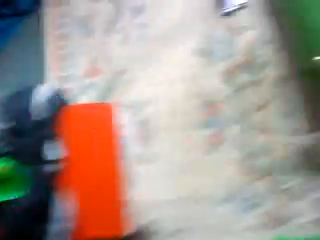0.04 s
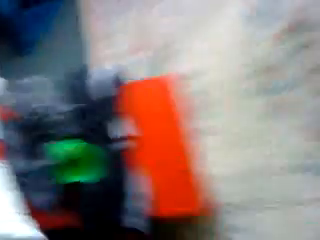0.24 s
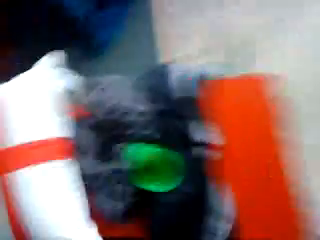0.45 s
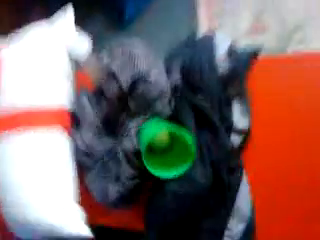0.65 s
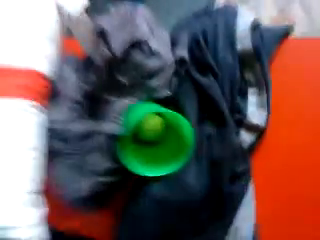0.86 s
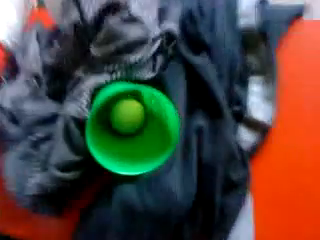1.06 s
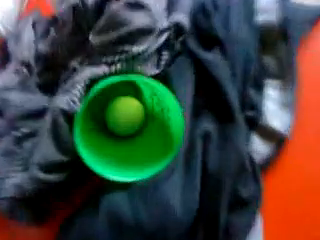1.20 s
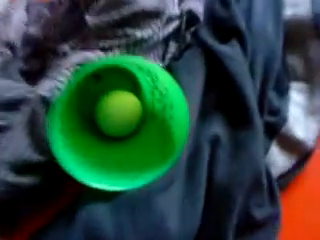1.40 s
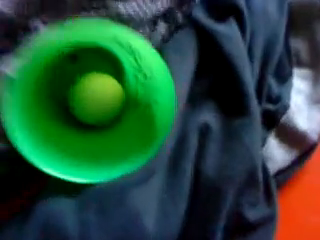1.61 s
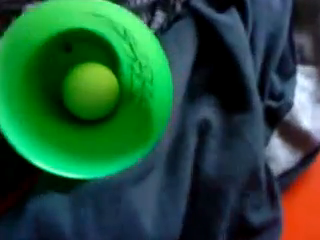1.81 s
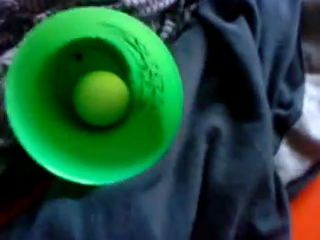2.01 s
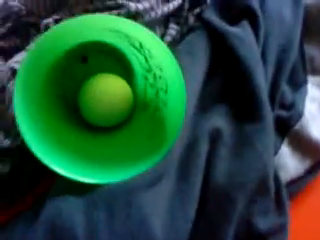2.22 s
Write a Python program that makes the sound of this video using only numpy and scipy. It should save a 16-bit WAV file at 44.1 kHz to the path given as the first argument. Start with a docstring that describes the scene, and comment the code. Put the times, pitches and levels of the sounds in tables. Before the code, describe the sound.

A small ball hits a plastic cup and settles in quick, fading hollow knocks. Before it come a tick and soft handling bumps; afterwards, faint cloth rustle and dull thuds on the moving microphone, with steady hiss in a small room.

```python
"""A ball rattles into a cup

A small ball hits a plastic cup on a heap of clothes, drops to the bottom and rattles to rest.
Each knock rings the cup's hollow near 950 Hz and its thin wall above that; a small room answers.
Someone moves with a camera: rustling clothes, soft bumps and a tick sound over hiss and rumble."""
import sys
import numpy as np
from scipy import signal
from scipy.fft import rfft, irfft, next_fast_len
from scipy.io import wavfile
from scipy.ndimage import map_coordinates

SR = 44100
rng = np.random.default_rng(int(sys.argv[2]) if len(sys.argv) > 2 else 0)


def dump_mix(stems):
    """Bounce the given channels to the path in sys.argv[1] as a 16-bit WAV at rate SR."""
    frames = np.atleast_2d(stems).T  # one column per channel
    limited = np.clip(frames, -1, 1)  # hard clip at full scale
    pcm = np.round(limited * 32767).astype(np.int16)
    wavfile.write(sys.argv[1], SR, pcm)


N = 103635

# The ball's knocks: t/s, level/dB, bottom/dB, wall/dB, crack/dB, pitch ratio of the hollow.
# Bottom, wall and crack turn that part of the knock up or down.
CUP_KNOCKS = [(0.4413, -16, -9.5, 5, 1, 1.01), (0.4457, -23, -8.5, -3.5, 0.5, 1.02),
              (0.4548, -31, -3, 3, 10.5, 1.1), (0.4808, -32, -4, -6, 2.5, 1.0),
              (0.4888, -32, 5, -10.5, 2, 1.01), (0.5042, -22, 6, 5, -1.5, 1.0),
              (0.5083, -24.5, 1, -3.5, -0.5, 1.0), (0.5377, -29.5, -4, -3, -1.5, 1.0),
              (0.5427, -40, -0.5, -2, 4, 1.1), (0.6514, -30, -11, -4.5, -6.5, .99),
              (0.662, -43, -4.5, 6, 2, 1.25), (0.691, -39.5, -14, -7, -9, .99),
              (0.769, -35.5, -9, -13, -18, 0.92), (0.8048, -33, -11, -7.5, -5, .97),
              (0.8178, -37.5, -10, -11, -9, 0.95), (0.9572, -40, 10, 4.5, 0, 0.99)]
# Tones of the cup's hollow, bottom and wall: f/Hz, level/dB, t60/s (time to fade by 60 dB)
HOLLOW_TONES = [(942, -16, 0.24), (886, -12.5, 0.085), (954, -0.5, 0.063), (1140, -9.5, 0.062),
                (1232, -18.5, 0.054)]
BOTTOM_TONES = [(568.5, -18.5, .1), (648, -7, 0.055), (724, -6, 0.051), (785, -14, .07)]
WALL_TONES = [(2034, -13.5, 0.044), (2256, -8, 0.029), (2350, -6, 0.031), (2526, -13.5, 0.034),
              (2814, -17, 0.056), (3080, -20, .05), (3355, -17, 0.043)]
# The colour (mix of low and high) of the crack at contact: f/Hz, level/dB
CRACK_COLOUR = [(200, -4.5), (480, -6), (1100, 3), (1550, -14), (2300, 2), (3300, -2.5), (4500, -6),
                (6000, -6.5), (7500, -9.5), (9000, -9)]
ATTACK_S, RADIATION_HZ = 0.00029, 520

def ball_in_cup():
    """Each knock makes a short crack and rings the cup's hollow, bottom and wall in its own mix."""
    out = np.zeros(N)
    for s, db, bottom_db, wall_db, crack_db, pitch in CUP_KNOCKS:
        hollow = ring(HOLLOW_TONES, pitch)
        bottom = amp(bottom_db) * ring(BOTTOM_TONES, pitch=0.98)
        wall = amp(wall_db) * ring(WALL_TONES, pitch=0.99)
        crack = amp(crack_db - 2.5) * burst(CRACK_COLOUR, t60=0.033, attack_s=ATTACK_S)
        knock = hollow - bottom + wall + crack  # minus: the bottom swings against the air
        add(out, s, amp(db) * in_room(knock))
    return out


def ring(tones, pitch):
    """Struck tones fade away; the small cup gives off little sound below RADIATION_HZ."""
    t = np.arange(SR // 2) / SR
    hz, db, t60 = np.transpose(tones)[:, :, None]
    scatter_db = rng.standard_normal(hz.shape)
    fade = amp(db + scatter_db - 60 * t / t60)
    swing = (fade * np.sin(2 * np.pi * hz * pitch * t)).sum(0)
    swing *= 1 - np.exp(-t / ATTACK_S)
    return signal.sosfilt(signal.butter(2, RADIATION_HZ, "high", fs=SR, output="sos"), swing)


# How long the room's echo lasts: f/Hz, t60/s
ROOM_FADE = [(200, 0.26), (1000, 0.28), (3000, 0.16), (8000, 0.3)]
ROOM_DB, ROOM_BUILD_S = -6, 0.012

def in_room(x):
    """The small room adds a blur of echoes that builds up quickly and dies away."""
    hz, t, spectra = signal.stft(rng.standard_normal(SR // 2), SR, nperseg=256)
    fade = amp(-60 * t / along(ROOM_FADE, hz)[:, None])
    tail = signal.istft(spectra * fade, SR, nperseg=256)[1]
    tail *= np.clip(np.arange(len(tail)) / SR / ROOM_BUILD_S, 0, 1) ** 4
    echo = signal.fftconvolve(x, tail / np.linalg.norm(tail))[:len(x)]
    return x + amp(ROOM_DB) * echo


# Soft bumps of the moving person and dull thuds on the camera body: t/s, level/dB, t60/s
SOFT_BUMPS = [(0.2045, -32.5, .11), (0.283, -43, .14), (0.317, -35.5, 0.063)]
DULL_THUDS = [(0.54, -32.5, 0.14), (0.581, -33, .13), (0.98, -49, 0.16), (1.275, -39, 0.23),
              (1.735, -37.5, 0.084), (2.03, -45, 0.16), (2.23, -44, 0.18)]
# Colours of a bump, a thud and the tick: f/Hz, level/dB
BUMP_COLOUR = [(60, -7), (155, 4.5), (240, -4), (420, -9.5), (700, -0.5), (950, -2.5), (1400, -19.5),
               (2350, -9.5), (4000, -18), (8000, -28.5)]
THUD_COLOUR = [(20, -24), (50, 17), (90, -2), (180, -7.5), (400, -45.5), (1500, -57)]
TICK_COLOUR = [(500, -16), (3000, -10), (4600, 0.5), (8500, 2)]
# Loudness of the hollow drone under the bumps: t/s, level/dB
DRONE_LEVEL = [(0.2, -77), (0.29, -44.5), (0.36, -47.5), (0.43, -57), (0.46, -39), (0.53, -65), (0.65, -65)]
DRONE_HZ, DRONE_WIDTH_HZ = 230, 54

def handling():
    """Carrying the camera makes soft bumps with a hollow drone, dull thuds and one sharp tick."""
    out = np.zeros(N)
    for s, db, t60 in SOFT_BUMPS:
        add(out, s, amp(db) * in_room(burst(BUMP_COLOUR, t60, attack_s=0.0009)))
    for s, db, t60 in DULL_THUDS:
        add(out, s, amp(db) * burst(THUD_COLOUR, t60, attack_s=0.0036))
    tick = amp(-14) * burst(TICK_COLOUR, t60=0.0035, attack_s=0.0001)
    add(out, 0.0951, tick)
    drone = filtered(rng.standard_normal(N), lambda hz: 1 / (1 + ((hz - DRONE_HZ) / DRONE_WIDTH_HZ) ** 2))
    return out + level(DRONE_LEVEL) * unit(drone)


# Brief brushes of cloth: middle t/s, half length/s, level/dB, middle f/Hz
CLOTH_BRUSHES = [(0.062, 0.034, -55.5, 7500), (0.091, 0.0021, -39, 6760), (0.105, .006, -47, 6170),
                 (0.222, 0.012, -49, 6000), (0.291, 0.014, -52.5, 5000), (0.333, 0.019, -52, 5500),
                 (0.373, 0.0082, -50, 3500), (0.544, 0.0071, -34.5, 6600), (0.575, 0.017, -47.5, 6500),
                 (0.633, 0.0077, -49, 6800), (0.929, .025, -51, 2000), (1.087, 0.029, -52.5, 3200),
                 (1.558, 0.023, -64, 3000)]
# Loudness of the sliding sleeve: t/s, level/dB
SLEEVE_LEVEL = [(0.7, -75), (0.82, -56.5), (0.95, -54.5), (1.2, -57.5), (1.32, -55), (1.38, -74)]
# Its colour: f/Hz, level/dB
SLEEVE_COLOUR = [(200, 2), (500, -3), (900, -4), (1200, 5.5), (1700, -4), (3000, -12), (5000, -6),
                 (5800, -0.5), (6300, -16), (9000, -21)]
BRUSH_OCTAVES, TOP_HZ = 0.55, 9300

def cloth():
    """Fabric rubs in brief grainy swells, and a sleeve makes one longer slide."""
    t = np.arange(N) / SR
    out = level(SLEEVE_LEVEL) * noise(SLEEVE_COLOUR)
    for s, half_s, db, middle_hz in CLOTH_BRUSHES:
        band = lambda hz: (hz < TOP_HZ) / np.hypot(1, np.log2((hz + 1) / middle_hz) / BRUSH_OCTAVES)
        rub = unit(filtered(rng.standard_normal(N), band))
        swell = np.exp(-0.5 * ((t - s) / half_s) ** 2)
        out += amp(db) * rub * swell
    grain = unit(amp(1.5 * wobble(600)))
    return out * grain


# Loudness of the hiss, the rumble and the swaying air: t/s, level/dB
HISS_LOUDNESS = [(0.0, -55), (0.18, -57), (0.47, -51), (0.6, -52.5), (1.01, -52.5), (1.5, -55.5),
                 (1.92, -58), (2.35, -58.5)]
RUMBLE_LOUDNESS = [(0, -52.5), (0.7, -51), (1.35, -51), (1.65, -52.5), (2.35, -53.5)]
SWAY_LOUDNESS = [(0, -51), (0.3, -46.5), (0.5, -38.5), (0.72, -45), (0.89, -29), (1.14, -43), (1.29, -36),
                 (1.48, -47), (2.35, -52.5)]
# Colours of the hiss and the rumble: f/Hz, level/dB
HISS_COLOUR = [(180, -30.5), (300, -1.5), (554, -3.5), (753, -6.5), (1190, -7.5), (1490, -9), (1790, -8),
               (3080, -10), (5610, -13.5), (7410, -16.5), (8400, -16), (10900, -50), (18500, -120)]
RUMBLE_COLOUR = [(15, -4.5), (30, -5), (60, 0.5), (110, -5), (200, -7), (300, -13.5), (500, -19.5),
                 (1000, -29.5), (3000, -57)]
SWAY_HZ = 13.5

def background():
    """Hiss sinks as the movement ends, handling rumbles, and air sways against the moving microphone."""
    hiss = amp(1 + 0.59 * wobble(14)) * level(HISS_LOUDNESS) * noise(HISS_COLOUR)
    rumble = amp(0.76 * wobble(7.32)) * level(RUMBLE_LOUDNESS) * noise(RUMBLE_COLOUR)
    sway_hz = SWAY_HZ * (1 + 0.1465 * wobble(9.7))
    sway = level(SWAY_LOUDNESS) * unit(np.sin(2 * np.pi * np.cumsum(sway_hz) / SR))
    return hiss + rumble + sway


def amp(db):
    """Turn decibels into a number to multiply by."""
    return 10 ** (np.asarray(db) / 20)


def unit(x):
    """Scale x to an average strength (rms) of 1."""
    return x / np.sqrt(np.mean(x ** 2) + 1e-20)


def along(points, hz):
    """Read between (f/Hz, value) points on a log frequency scale."""
    f, values = np.transpose(points)
    return np.interp(np.log(hz + 1), np.log(f + 1), values)


def level(rows):
    """Join (t/s, level/dB) points into a gain for every sample."""
    return amp(np.interp(np.arange(N) / SR, *np.transpose(rows)))


def wobble(rate):
    """A smooth curve through `rate` random points a second."""
    points = rng.standard_normal(int(N * rate / SR) + 4)
    return map_coordinates(points, [np.arange(N) * rate / SR])


def filtered(x, response):
    """Turn each frequency in x up or down by response(hz)."""
    size = next_fast_len(len(x) + SR // 4)
    hz = np.fft.rfftfreq(size, 1 / SR)
    return irfft(rfft(x, size) * response(hz), size)[:len(x)]


def noise(colour, size=N):
    """Noise of the given colour, at strength 1."""
    return unit(filtered(rng.standard_normal(size), lambda hz: amp(along(colour, hz))))


def burst(colour, t60, attack_s):
    """Noise that rises quickly and dies away."""
    t = np.arange(SR // 2) / SR
    return noise(colour, size=len(t)) * amp(-60 * t / t60) * (1 - np.exp(-t / attack_s))


def add(track, s, x):
    """Mix x into the track, starting at s seconds."""
    part = track[round(s * SR):][:len(x)]
    part += x[:len(part)]


def scene():
    """All the sounds meet at one microphone."""
    return (ball_in_cup() + handling() + cloth() + background())[None]


# How well the microphone hears each frequency: f/Hz, level/dB
MIC_RESPONSE = [(10, 0), (7600, 0), (8200, -7.5), (8600, -16), (9000, -40)]

def record(dry):
    """The microphone loses the highest treble and passes nothing above TOP_HZ."""
    return filtered(dry[0], lambda hz: amp(along(MIC_RESPONSE, hz)) * (hz < TOP_HZ))[None]


dry = scene()
out = record(dry)
dump_mix(out)
```